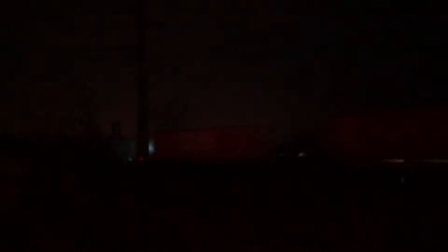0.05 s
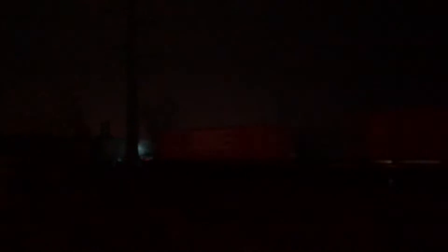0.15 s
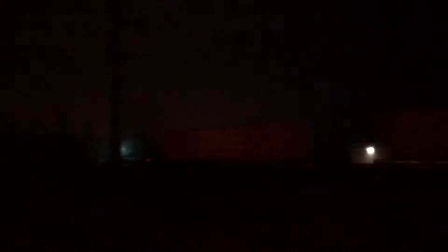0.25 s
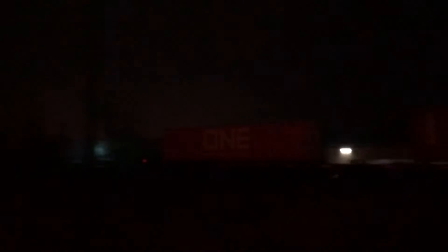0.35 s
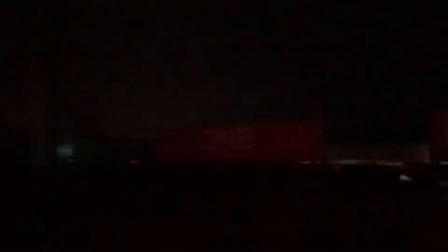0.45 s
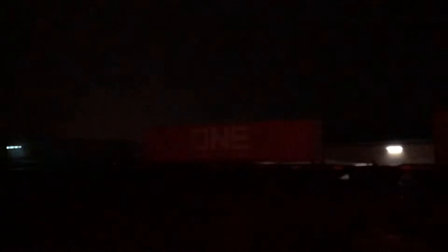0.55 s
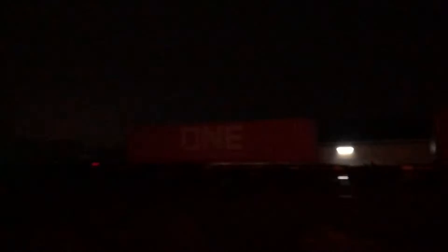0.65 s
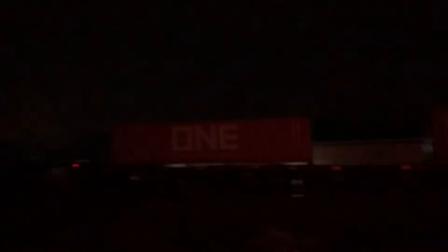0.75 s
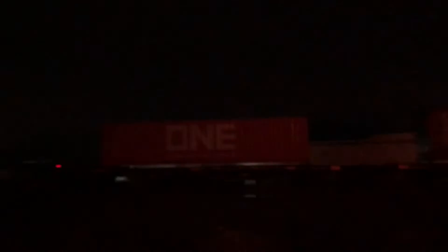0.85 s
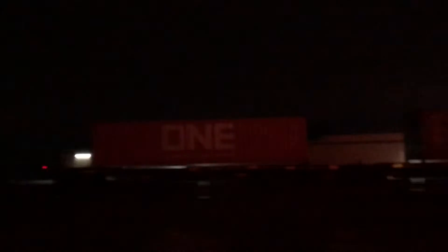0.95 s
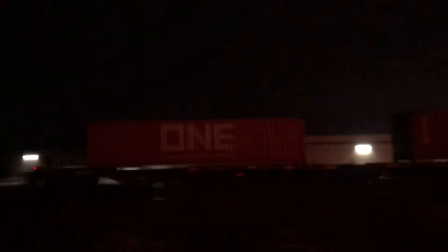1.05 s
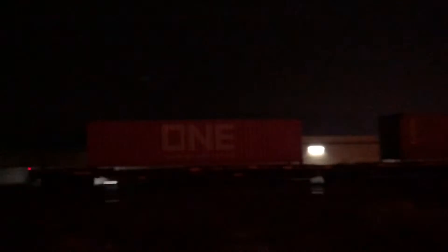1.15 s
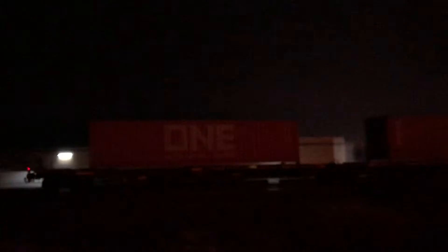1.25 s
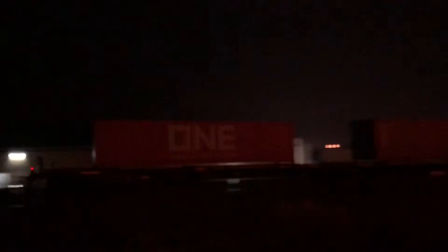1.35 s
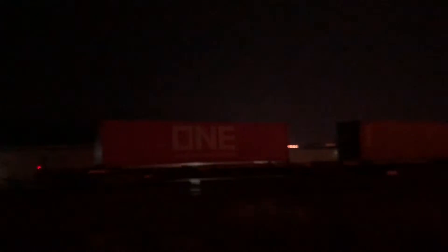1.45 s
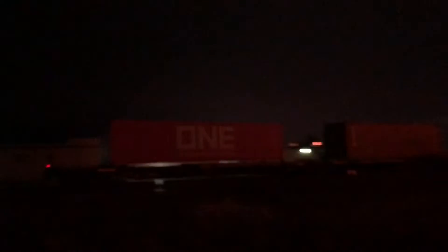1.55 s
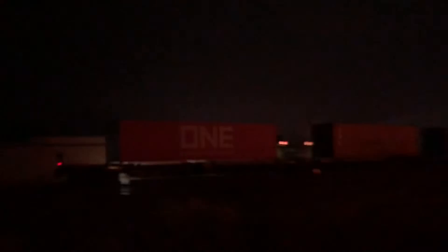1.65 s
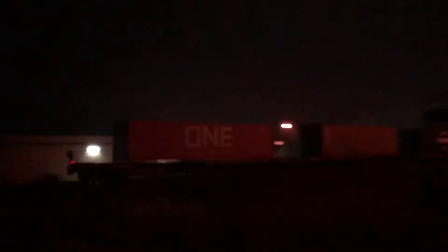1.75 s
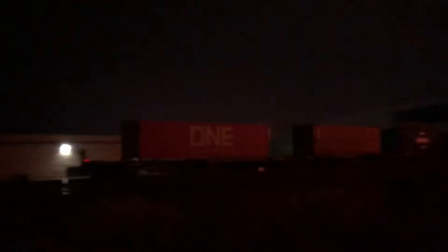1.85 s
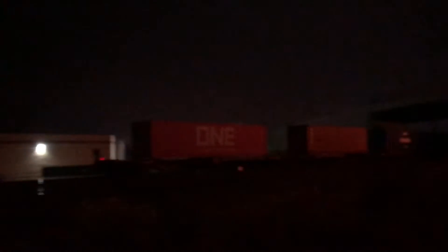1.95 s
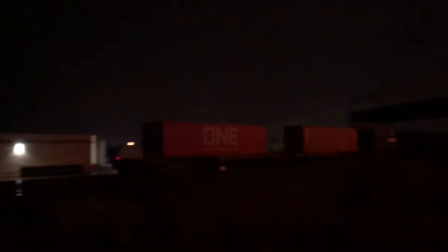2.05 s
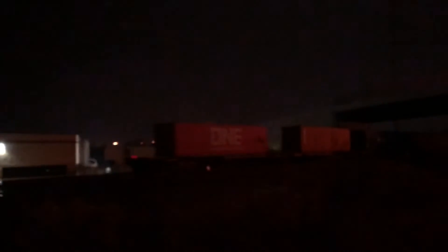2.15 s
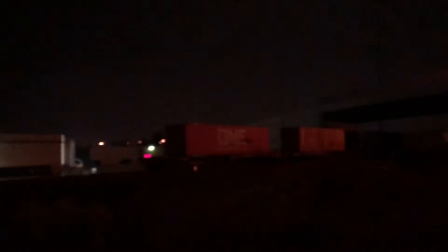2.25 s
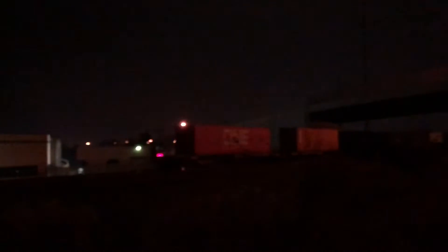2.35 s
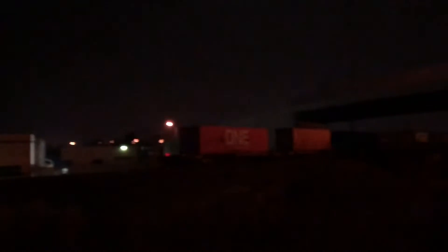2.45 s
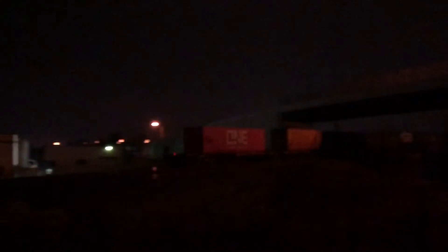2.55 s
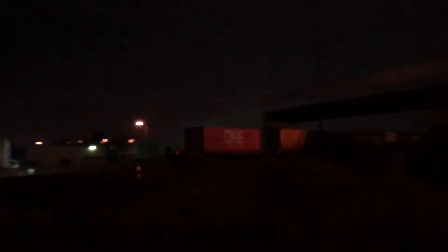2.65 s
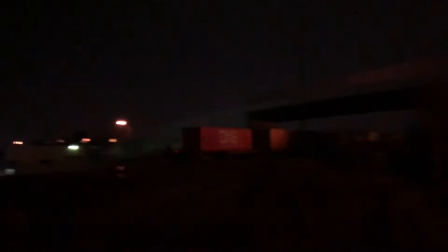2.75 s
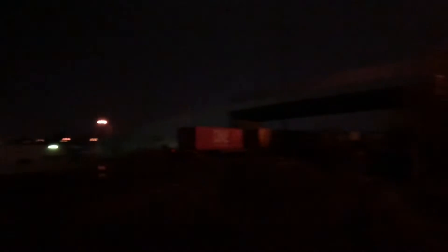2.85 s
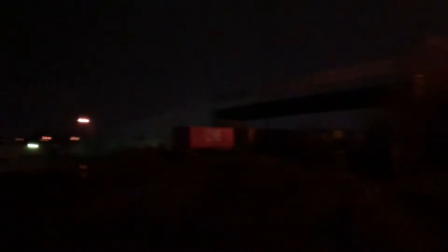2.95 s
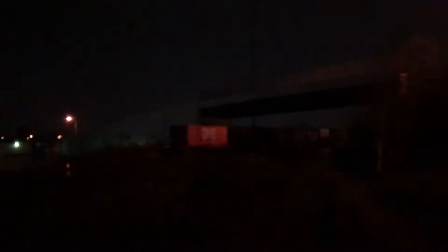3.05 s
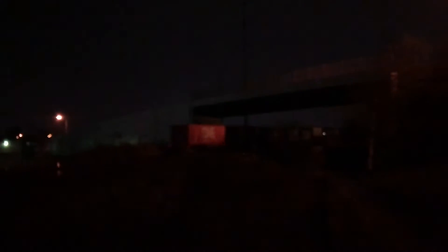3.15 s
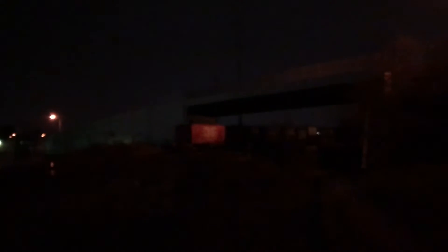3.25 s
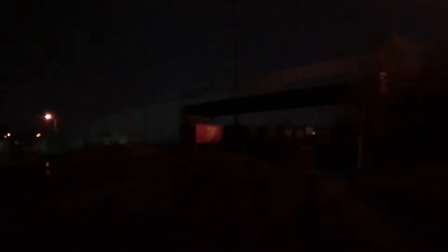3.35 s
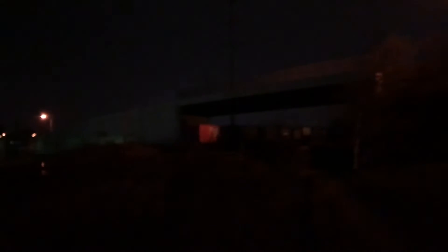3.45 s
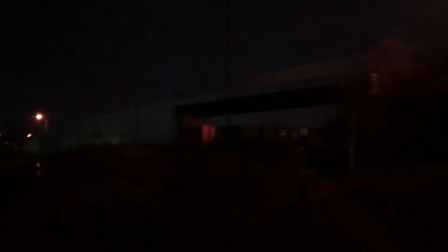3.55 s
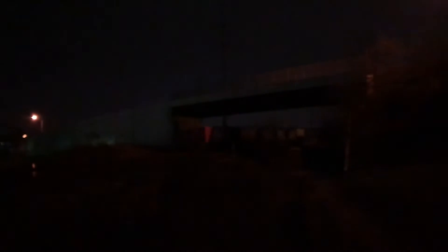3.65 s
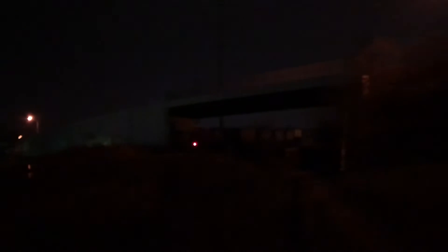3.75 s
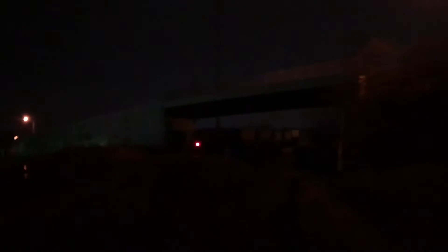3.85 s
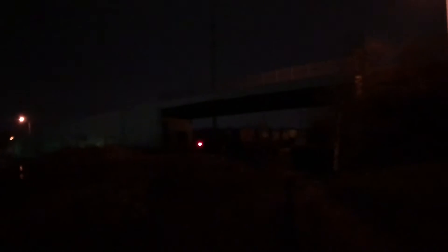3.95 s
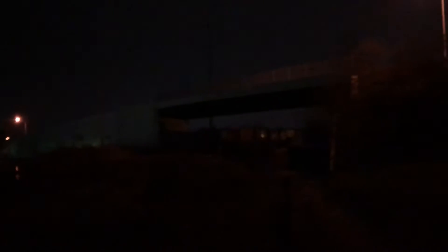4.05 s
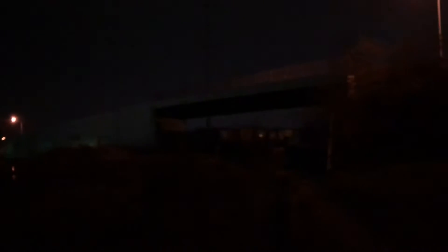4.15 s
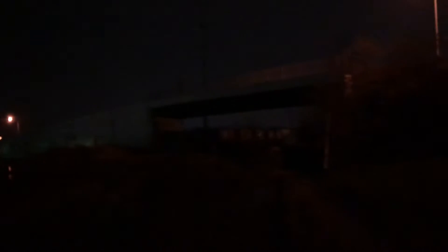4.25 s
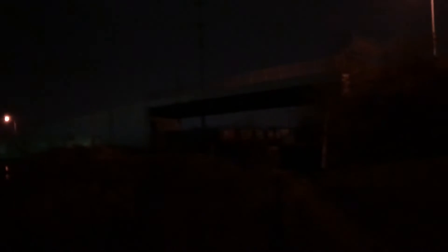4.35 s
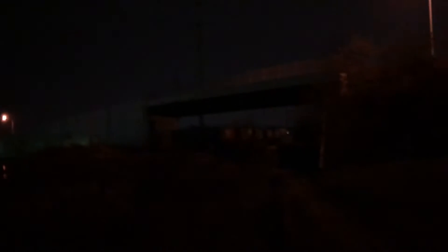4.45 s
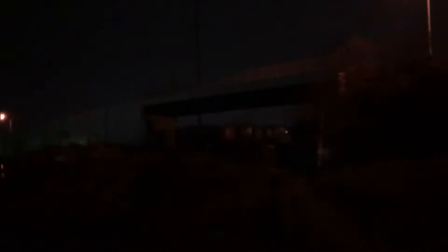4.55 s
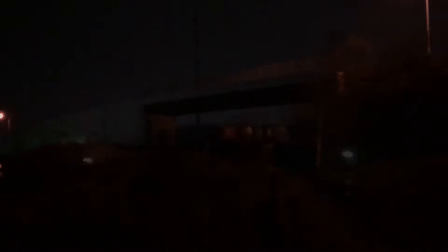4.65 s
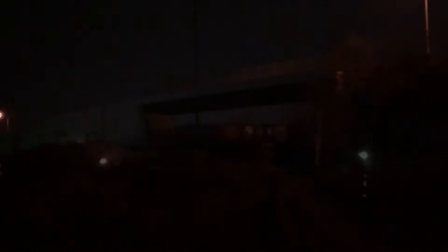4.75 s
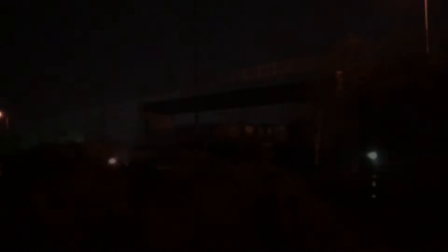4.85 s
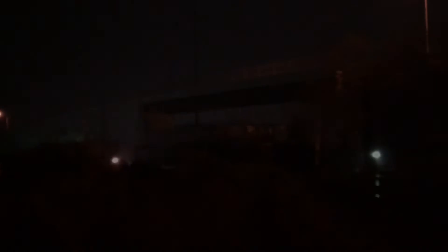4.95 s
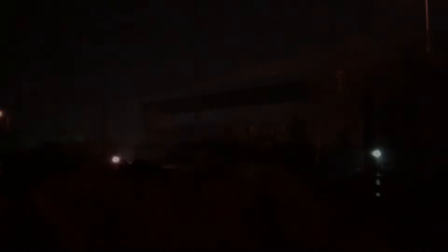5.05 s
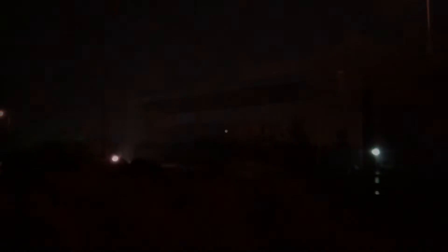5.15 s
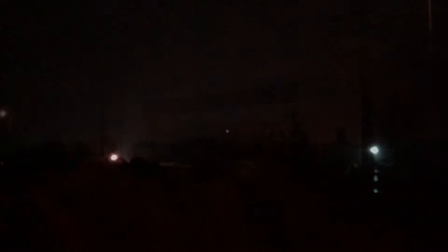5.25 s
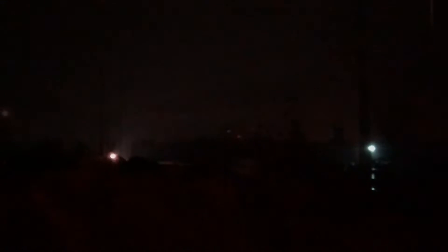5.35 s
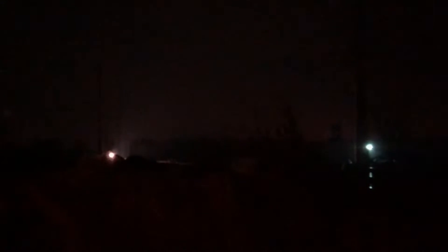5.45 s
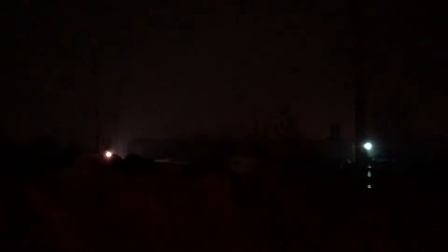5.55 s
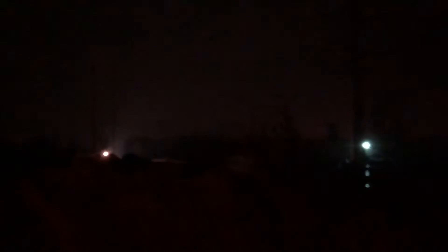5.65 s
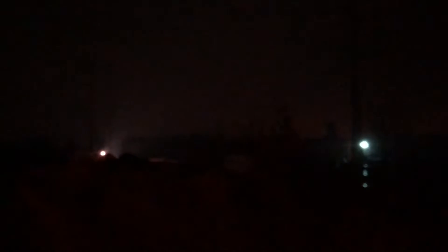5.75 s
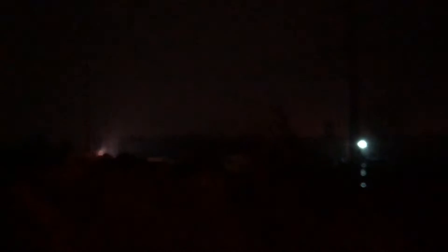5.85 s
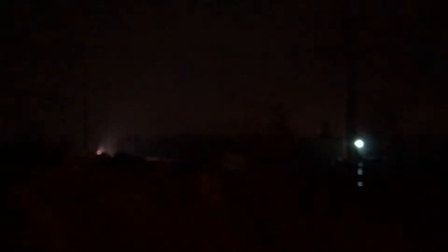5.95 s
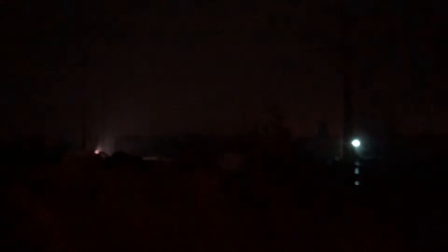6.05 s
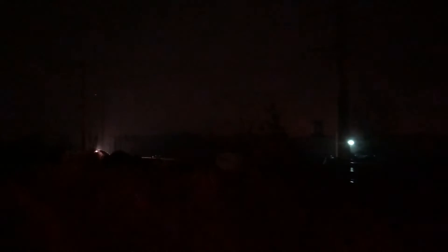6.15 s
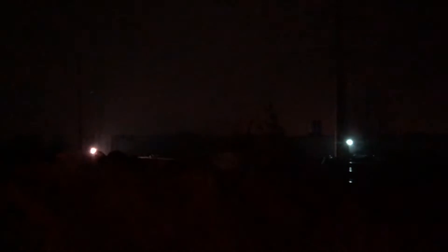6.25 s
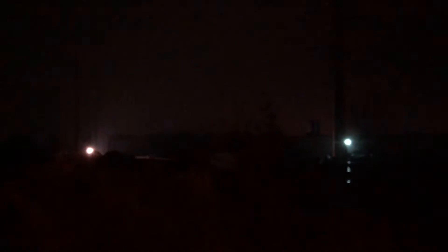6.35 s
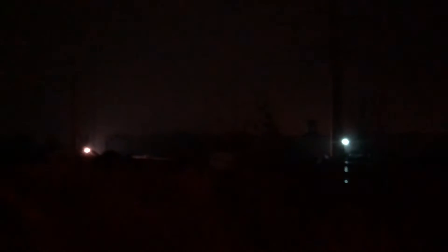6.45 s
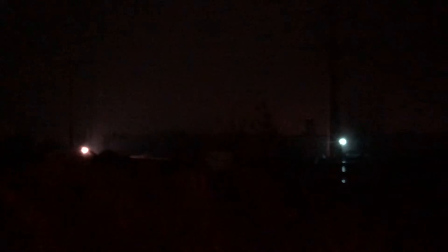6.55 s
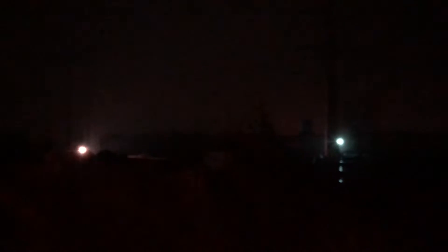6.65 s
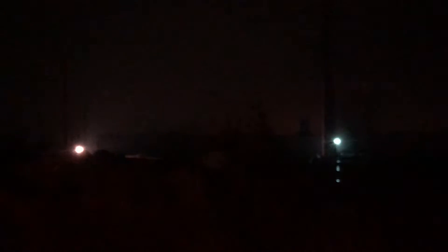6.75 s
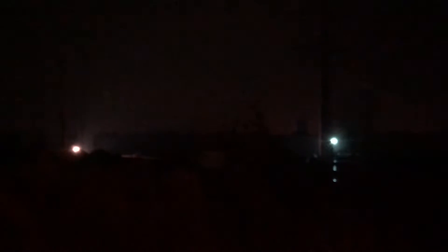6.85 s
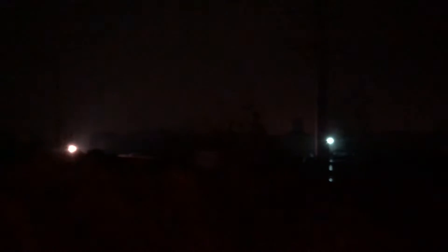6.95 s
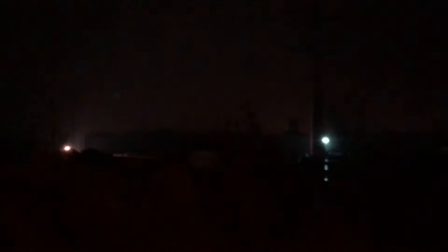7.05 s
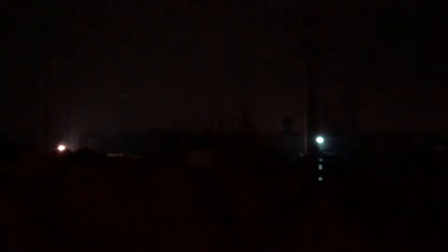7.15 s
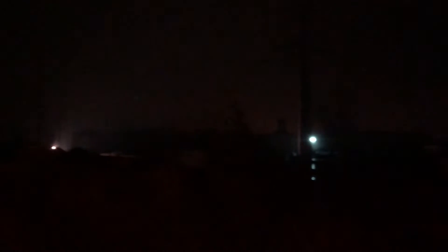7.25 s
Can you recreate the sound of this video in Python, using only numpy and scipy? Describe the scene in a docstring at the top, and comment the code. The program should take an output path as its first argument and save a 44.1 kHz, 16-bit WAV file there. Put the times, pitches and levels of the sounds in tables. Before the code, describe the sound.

The last wagons of a container train pass close by outdoors at night, with a loud roar of steel wheels, low rumble and gritty hiss. Axles hit a rail joint in two quick clusters of clanks and booming thumps, in the first 0.4 seconds and from 0.7 to 0.9 seconds. Weaker clacks follow until 1.5 seconds, and another near 2.4. Around 1 second the tail goes by, and the ringing of rails and wheels sinks slightly in pitch. The roar gradually recedes and dulls, with light rattling and faint, brief wheel squeaks around 0.3, 1 to 2, 3 and 4.8 seconds. From 4.8 to 5.5 seconds the train dissolves into a much quieter spot. There a diesel engine idles with a soft, low throb while another train rumbles far away, its faint rush growing a little from 6 seconds and lasting to the end, at about 7.5 seconds.

```python
"""Beside a railway line at night, the last wagons of a container train pass close by.
Axles strike a rail joint, and each impact excites the modes of wagon bodies, frames and wheels.
Rough steel rolling on steel roars, then recedes, its ringing lowered by the Doppler effect.
The sound dissolves into a quieter spot, where the firing pulses of an idling diesel drive its
exhaust pipe and another train rumbles far away."""
import sys
import numpy as np
from scipy import signal
from scipy.fft import rfft, irfft
from scipy.io import wavfile
from scipy.ndimage import map_coordinates

SR = 44100
rng = np.random.default_rng(int(sys.argv[2]) if len(sys.argv) > 2 else 0)


def materialize(psi):
    """Save the field psi as 16-bit PCM at rate SR to the path in sys.argv[1].

    A 1-D psi becomes a single channel; in a 2-D psi each row is a channel.
    """
    bounded = np.clip(np.atleast_2d(psi).T, -1, 1)
    quanta = np.round(bounded * 32767).astype(np.int16)
    wavfile.write(sys.argv[1], SR, quanta)


N = 322371

# Spectra of the background (relative density): frequency_hz, level_db
NIGHT_AIR_SPECTRUM = [(20, -6), (50, 2.5), (95, 4), (160, 0.5), (300, -6), (1000, -19.5), (5000, -32),
                      (15500, -41)]
FAR_RUMBLE_SPECTRUM = [(300, 3), (380, -12), (560, -0.5), (800, -1.5), (1000, -2), (1200, -6)]
FAR_RUSH_SPECTRUM = [(1000, -8), (1350, -2.5), (1560, 0), (1750, -4), (2000, -9), (2400, -14),
                     (3400, -26.5), (6000, -38)]
# Modes of the engine casing, plus the far train's wheel rush whining near 1.7 kHz: pitch_hz, width_hz, level_db
QUIET_SPOT_MODES = [(372, 4, -79), (474.3, 12.2, -72), (642, 27.5, -67.5), (693, 20, -65.5), (1700, 180, -72)]
# Firing of each cylinder: delay_ms, level_db
CYLINDER_FIRINGS = [(0.061, -1), (1.4, 0), (-1.1, 1)]
# Resonances at which the silencer delays each puff: pitch_hz, width_hz
SILENCER_MODES = [(125, 120), (215, 160)]
# Relative response of the exhaust pipe: frequency_hz, gain_db
EXHAUST_RESPONSE = [(20, -48.5), (36, -38.5), (54, -0.5), (81, 3.5), (107, -0.5), (134, 0.5), (158, -15.5),
                    (188, -0.5), (215, -11.5), (250, -7), (285, -24), (360, -27), (600, -37)]

# Spectra of the rolling noise (relative density): frequency_hz, level_db
GROUND_SPECTRUM = [(22, -22), (35, -9.5), (50, 3.5), (65, 0), (88, 4), (110, -16)]
WAGON_SPECTRUM = [(70, -2.5), (95, 0.5), (125, 3), (165, 1), (210, 0.5), (275, 0.5), (310, -2.5)]
TREAD_SPECTRUM = [(160, -15), (280, -7.5), (398, -3), (613, 0.5), (1060, -1.5), (1220, -4.5), (1450, -3.5),
                  (1600, -7.5), (1930, -10), (2120, -17.5), (2300, -14.5), (2990, -43.5), (5060, -120)]
HISS_SPECTRUM = [(1240, -34.5), (2100, -4.5), (2220, -10), (2510, 3), (2880, -4.5), (3160, 1), (3610, -2),
                 (3960, -2.5), (5230, -4), (9000, -30.5), (11700, -55.5), (19800, -120)]
GRIT_SPECTRUM = [(3530, -36), (6000, -1.5), (8260, -7.5), (10700, -14.5), (13200, -19), (15100, -16.5),
                 (15800, -19)]
# Swells as a bogie goes by or meets rough rail: centre_s, half_length_s, gain_db
ROLLING_SWELLS = [(0.212, 0.22, 5.5), (0.9, 0.21, 4), (1.8, 0.37, 1.4), (3.244, 0.067, 2.0),
                  (4.81, 0.11, 1)]
# Singing modes of rails and last wheels, as heard from behind: pitch_hz, width_hz, level_db
RAIL_MODES = [(586, 47, -2), (1062, 190, -4.5), (1474, 70, -11.5), (1898, 41, -6.5), (2458, 16, -6),
              (2628, 110, -12), (3188, 340, -6), (3910, 220, -13)]
LAST_WHEEL_MODES = [(2484, 32, -3.5), (3147, 8.3, -6), (3530, 35, -4), (3880, 51, -2.5), (5010, 56, -11)]
# Flanges brushing the rail: centre_s, pitch_hz, level_db, half_length_s
FLANGE_SQUEAKS = [(0.239, 3540, -25.5, 0.023), (.27, 8300, -43, .04), (0.327, 9230, -49, 0.046),
                  (1.018, 2627, -37.5, 0.087), (1.543, 2540, -42.5, 0.12), (1.85, 2515, -45, 0.22),
                  (2.966, 1500, -41.5, 0.082), (3.206, 3150, -49, 0.057), (4.809, 2420, -51, 0.1),
                  (4.842, 1437, -41.5, 0.087)]

# Axle impacts and wagon jolts: start_s, clank_db, thump_db, crash_db
IMPACTS = [(0.04, -3, -15.5, -18), (0.078, -6, -16, -21.5), (0.108, -5, -8.5, -17.5), (0.133, -5, -15, -19),
           (0.179, -13, -10, -21.5), (0.199, -6.5, -9, -18), (0.311, -11, -15, -27.5),
           (0.358, -13.5, -16.5, -29.5), (0.672, -6, -19.5, -22.5), (0.694, -1.5, -10, -20),
           (0.753, -0.5, -12, -17.5), (0.783, -5, -10.5, -16), (0.841, -4.5, -11, -18.5),
           (0.945, -20, -17.5, -29), (1.084, -14.5, -24, -32.5), (1.168, -18, -25, -36),
           (1.235, -14.5, -33, -35), (1.438, -14, -34, -30), (1.507, -15, -29, -36),
           (2.407, -17.5, -35, -53), (4.763, -22, -55, -71)]
# Spectra of an impact (relative density): frequency_hz, level_db
THUD_SPECTRUM = [(26, -37), (45, -19.5), (76, -9.5), (97, 9), (156, -2), (200, -7.5), (260, -37),
                 (440, -120)]
CLANK_SPECTRUM = [(130, -32), (220, -2.5), (326, -1), (424, -13), (516, -1.5), (640, -1.5), (810, -3.5),
                  (994, -10.5), (1400, -6.5), (1660, -13.5), (1980, -10.5), (2280, -19), (2690, -14),
                  (3000, -14), (3900, -50.5), (6600, -120)]
CRASH_SPECTRUM = [(1530, -23.5), (2600, -10.5), (3360, -2.5), (3680, -0.5), (5010, -4), (5490, 0),
                  (8510, -12), (10300, -12.5), (15800, -27)]
# Modes of the sprung body and of the axle with its side frames: pitch_hz, level_db, t60_s
BODY_MODES = [(52, -20.5, 0.51), (82.8, -3, 0.35), (115, 1, .2), (149, -1, 0.3), (180, -6.5, 0.6)]
AXLE_MODES = [(320.6, -10, 0.19), (483.3, -16.5, 0.23), (710, -23.5, 0.16), (784, -22, 0.2),
              (1371, -29.5, 0.44)]
# Modes of a struck wheel: pitch_hz, level_db
WHEEL_MODES = [(1324, -46.5), (1916, -52.5), (2697, -37), (3176, -52.5), (3526, -43.5), (3758, -41),
               (4156, -33), (4280, -66.5), (5329, -47.5), (5572, -52), (6315, -56), (6535, -56)]

LAST_WHEELS_S, SPEED_M_PER_S, TRACK_DISTANCE_M = 1.0, 25.0, 10.0
SOUND_M_PER_S = 343
CROSSFADE_START_S = 4.774


def from_db(db):
    """Amplitude ratio of a level in decibels."""
    return 10 ** (np.asarray(db) / 20)


def rms_one(x):
    """Normalisation to unit power."""
    return x / np.sqrt(np.mean(x ** 2) + 1e-20)


def seconds():
    """The time of every sample."""
    return np.arange(N) / SR


def ramp(start_s, length_s):
    """Linear rise from 0 to 1, then held."""
    return np.clip((seconds() - start_s) / length_s, 0, 1)


def drift(rate_hz):
    """Slow random modulation: low-passed noise of unit rms."""
    r = np.exp(-80 * np.pi * rate_hz / SR)   # one step every 40 samples
    slow = signal.lfilter([1], [1, -2 * r, r * r], rng.standard_normal(N // 40 + 2002))[2000:]
    return np.interp(np.arange(N) / 40, np.arange(len(slow)), rms_one(slow))


def colour(x, spectrum):
    """Minimum-phase filtering to a spectrum, falling 36 dB an octave beyond its ends; unit rms."""
    size = 16384
    octave = np.log2(np.maximum(np.arange(size // 2 + 1), 1) * SR / size)
    hz, db = np.transpose(spectrum)
    outside = np.abs(octave - np.clip(octave, np.log2(hz[0]), np.log2(hz[-1])))
    level_db = np.maximum(np.interp(octave, np.log2(hz), db) - 36 * outside, -110)
    cepstrum = irfft(np.log(from_db(level_db)))[:size // 2]
    response = irfft(np.exp(rfft(np.r_[cepstrum[0], 2 * cepstrum[1:]], size)))
    return rms_one(signal.oaconvolve(x, response[:size // 2])[:N])


def noise(spectrum, flutter_db=0, flutter_hz=10):
    """Coloured noise with optional random amplitude modulation."""
    return rms_one(colour(rng.standard_normal(N), spectrum) * from_db(flutter_db * drift(flutter_hz)))


def rattle(spectrum, per_s, spread_db):
    """Shot noise: countless small steel contacts of uneven strength."""
    sizes = from_db(spread_db * np.minimum(rng.exponential(1, N), 4)) * rng.choice([-1, 1], N)
    return colour(sizes * (rng.random(N) < per_s / SR), spectrum)


def ring(x, hz, t60):
    """Damped oscillator: a unit impulse starts a sine that falls 60 dB in t60 seconds."""
    r, w = np.exp(-np.log(1000) / (t60 * SR)), 2 * np.pi * hz / SR
    return signal.lfilter([0, np.sin(w)], [1, -2 * r * np.cos(w), r * r], x + 1e-18)


def resonances(modes):
    """Forced vibration: noise drives each mode, through two resonators for steep flanks."""
    out = 0
    for hz, width_hz, db in modes:
        t60 = np.log(1000) / (np.pi * 1.5 * width_hz)
        out = out + from_db(db) * rms_one(ring(ring(rng.standard_normal(N), hz, t60), hz, t60))
    return out


def impulses(times, level_db):
    """Impulse train: one click for each blow."""
    out = np.zeros(N)
    out[np.clip(np.round(times * SR).astype(int), 0, N - 1)] = from_db(level_db)
    return out


def struck(clicks, modes):
    """Free vibration: damped modes of alternating sign answer every click."""
    return sum(from_db(db) * ring(clicks, hz, t60) * (-1) ** k for k, (hz, db, t60) in enumerate(modes))


def shaking(clicks, rise_s, t60, tail_db, tail_t60):
    """Two-slope envelope: energy spreads through the wagon, dies fast and lingers in the containers."""
    t = np.arange(2 * SR) / SR
    early = np.exp(-np.log(1e6) * t / t60)
    tail = from_db(tail_db) ** 2 * np.exp(-np.log(1e6) * t / tail_t60)
    energy = (1 - np.exp(-t / rise_s)) ** 2 * (early + tail)
    return np.sqrt(np.maximum(signal.oaconvolve(clicks ** 2, energy)[:N], 0))


def night_air():
    """Ambient noise: steady, with its power mostly at low frequencies."""
    return from_db(-59.5) * noise(NIGHT_AIR_SPECTRUM)


def far_train():
    """Attenuation with distance leaves a dull rumble; the wheel rush grows as it comes into the open."""
    hidden = 1 - ramp(start_s=5.87, length_s=0.77)
    rumble = from_db(-62) * noise(FAR_RUMBLE_SPECTRUM)
    rush = from_db(-60.5 - 6 * hidden) * noise(FAR_RUSH_SPECTRUM)
    return rumble + rush


def idling_diesel(firing_hz=26.82, first_s=.0305, uneven_db=1.0, jitter_s=.0002):
    """Periodic excitation: unequal cylinders fire into the exhaust with a limp, the casing rings, and the far
    train's rush whines near 1.7 kHz."""
    firing = np.arange(int(N / SR * firing_hz))
    delay_ms, level_db = np.array(CYLINDER_FIRINGS)[firing % len(CYLINDER_FIRINGS)].T
    chance = rng.standard_normal((len(firing), 2))
    times = first_s + firing / firing_hz + delay_ms / 1000 + jitter_s * chance[:, 0]
    puffs = impulses(times, level_db + uneven_db * chance[:, 1])
    for hz, width_hz in SILENCER_MODES:   # all-pass stages round off each puff
        r = np.exp(-np.pi * width_hz / SR)
        poles = [1, -2 * r * np.cos(2 * np.pi * hz / SR), r * r]
        puffs = signal.lfilter(poles[::-1], poles, puffs)
    return from_db(-46) * colour(puffs, EXHAUST_RESPONSE) + resonances(QUIET_SPOT_MODES)


def last_wheels_m():
    """Uniform motion: how far along the track the last wheels are past the listener."""
    return SPEED_M_PER_S * (seconds() - LAST_WHEELS_S)


def doppler(x):
    """Doppler effect: a sound on the last wagon starts sharp and sinks towards its given pitch."""
    along_m, mach = last_wheels_m(), SPEED_M_PER_S / SOUND_M_PER_S
    ratio = (1 + mach) / (1 + mach * along_m / np.hypot(TRACK_DISTANCE_M, along_m))
    return map_coordinates(x, [np.cumsum(ratio)], order=3, mode="wrap")


def rolling_gain(near_db, loss_db, swell):
    """Spreading loss: loss_db per doubling of distance once past, with swells and a bridge's shadow."""
    distance_m = np.hypot(TRACK_DISTANCE_M, np.maximum(last_wheels_m(), 0))
    doublings = np.log2(distance_m / TRACK_DISTANCE_M)
    swell_db = sum(db * np.exp(-np.minimum(((seconds() - centre_s) / half_s) ** 2, 20))
                   for centre_s, half_s, db in ROLLING_SWELLS)
    bridge_db = 1.62 * ramp(start_s=3.47, length_s=0.14)
    return from_db(near_db - loss_db * doublings + swell * swell_db - bridge_db)


def loose_gear(per_s=18, spread_db=1.5):
    """Random impacts: couplings and container locks knock lightly all along the train."""
    knocks = (rng.random(N) < per_s / SR) * from_db(spread_db * rng.standard_normal(N))
    envelope = shaking(knocks, rise_s=0.0054, t60=0.04, tail_db=-19, tail_t60=.5)
    return rolling_gain(near_db=-33, loss_db=3.7, swell=.3) * rms_one(noise(CLANK_SPECTRUM) * envelope)


def flange_squeaks(waver_hz=14):
    """Friction excitation: a flange brushes the rail, and one wheel mode swells, wavers and dies."""
    t, out = seconds(), np.zeros(N)
    waver = np.cumsum(waver_hz * drift(10)) / SR
    for centre_s, hz, db, half_s in FLANGE_SQUEAKS:
        on = np.abs(t - centre_s) < 3 * half_s
        envelope = np.sqrt(2) * from_db(db) * np.exp(-((t[on] - centre_s) / half_s) ** 2)
        out[on] += envelope * np.sin(2 * np.pi * (hz * t[on] + waver[on]))
    return out


def wheel_song():
    """Light damping: a few narrow wheel modes ring on, Doppler-shifted as the last wagon goes by."""
    song = rms_one(doppler(resonances(LAST_WHEEL_MODES)))
    return rolling_gain(near_db=-42, loss_db=5.1, swell=0.54) * song


def wheel_shimmer(per_s=330, t60=.4):
    """High modal density: the wheels' many treble modes are each set ringing now and then."""
    out = np.zeros(N)
    t = np.arange(int(.2 * SR)) / SR
    envelope = (1 - np.exp(-t / .012)) * np.exp(-np.log(1000) * t / t60)
    for start, pitch, phase in rng.random((int(per_s * N / SR), 3)):
        at, hz = int(start * N), 2000 + 13800 * pitch
        out[at:at + len(t)] += (envelope * np.sin(2 * np.pi * (hz * t + phase)))[:N - at]
    return colour(out, CRASH_SPECTRUM)


def rolling():
    """Roughness excitation: treads shake the wagons and set the rails singing; grit fades fastest."""
    ground = noise(GROUND_SPECTRUM, flutter_db=3, flutter_hz=7.2)
    wagons = noise(WAGON_SPECTRUM, flutter_db=2, flutter_hz=6.4)
    roar = from_db(-2.22) * noise(TREAD_SPECTRUM, flutter_db=1.02, flutter_hz=14)
    crunch = from_db(-9.5) * rattle(TREAD_SPECTRUM, per_s=1200, spread_db=1.5)
    singing = from_db(-6) * rms_one(doppler(resonances(RAIL_MODES)))
    hiss = from_db(-2.26) * rattle(HISS_SPECTRUM, per_s=9000, spread_db=2.5) * from_db(.5 * drift(13))
    grit = from_db(-2) * noise(GRIT_SPECTRUM, flutter_db=1.5, flutter_hz=25)
    shimmer = from_db(-0.5) * wheel_shimmer()
    return (rolling_gain(near_db=-32, loss_db=5.4, swell=.6) * ground
            + rolling_gain(near_db=-31.5, loss_db=2.1, swell=0.99) * wagons
            + rolling_gain(near_db=-26.5, loss_db=2.19, swell=0.91) * (roar + crunch)
            + rolling_gain(near_db=-34.5, loss_db=2.83, swell=1.3) * (hiss + singing)
            + rolling_gain(near_db=-40.5, loss_db=7.55, swell=1.2) * (grit + shimmer))


def axle_blows():
    """Impact excitation at the joint: the body booms, the axle clunks, gear crashes, the wheel rings."""
    times, clank_db, thump_db, crash_db = np.transpose(IMPACTS)
    clank, thump, crash = (impulses(times, db) for db in (clank_db, thump_db, crash_db))
    body = from_db(-2.5) * struck(thump, BODY_MODES)
    axle = from_db(-1.6) * struck(clank, AXLE_MODES)
    frame = from_db(-6.5) * noise(THUD_SPECTRUM)
    frame *= shaking(thump, rise_s=0.01, t60=0.28, tail_db=-8, tail_t60=0.85)
    gear = from_db(-6.5) * rattle(CLANK_SPECTRUM, per_s=5400, spread_db=-0.5)
    gear *= shaking(clank, rise_s=0.0086, t60=0.17, tail_db=-12.5, tail_t60=1.1)
    steel = from_db(1) * rattle(CRASH_SPECTRUM, per_s=9700, spread_db=-0.5)
    steel *= shaking(crash, rise_s=0.01, t60=0.3, tail_db=-22.5, tail_t60=0.43)
    wheels = from_db(-13) * rms_one(resonances([(hz, 30, db) for hz, db in WHEEL_MODES]))
    wheels *= shaking(crash, rise_s=.004, t60=0.23, tail_db=-9, tail_t60=0.9)
    return body + axle + frame + gear + steel + wheels


def fade_out(x, low_db_per_s=26.5, treble_db_per_s=33.5, crossover_hz=2400):
    """Exponential decay, faster in the treble, closed by a short linear fade."""
    low = signal.sosfiltfilt(signal.butter(2, crossover_hz, fs=SR, output="sos"), x)
    elapsed_s = np.maximum(seconds() - CROSSFADE_START_S, 0)
    sinking = from_db(-low_db_per_s * elapsed_s) * low + from_db(-treble_db_per_s * elapsed_s) * (x - low)
    return sinking * (1 - ramp(start_s=5.35, length_s=0.18))


def scene():
    """Superposition: over the night air, the train crossfades into the quiet spot; channels alike."""
    train = rolling() + wheel_song() + loose_gear() + axle_blows() + flange_squeaks()
    quiet_spot = idling_diesel() + far_train()
    mono = fade_out(train) + ramp(CROSSFADE_START_S, length_s=0.68) * quiet_spot + night_air()
    return np.array([mono, mono])


def record(dry, ceiling=.95, cutoff_hz=15800):
    """Soft saturation rounds the highest peaks, and a steep low-pass filter limits the bandwidth."""
    rounded = dry / (1 + (np.abs(dry) / ceiling) ** 6) ** (1 / 6)
    return signal.sosfilt(signal.ellip(12, .1, 80, cutoff_hz, fs=SR, output="sos"), rounded)


dry = scene()
out = record(dry)
materialize(out)
```